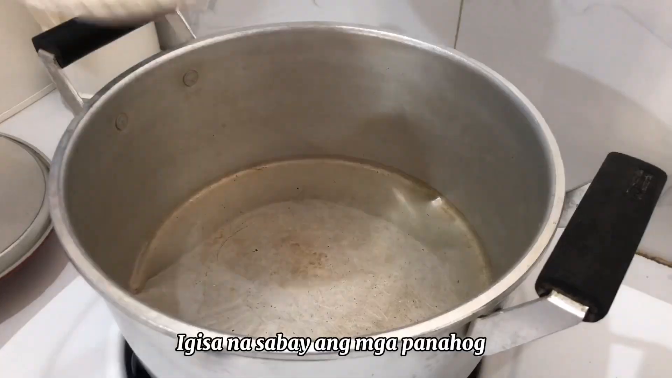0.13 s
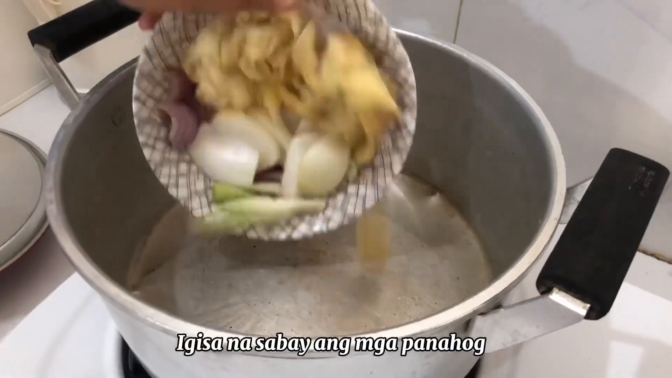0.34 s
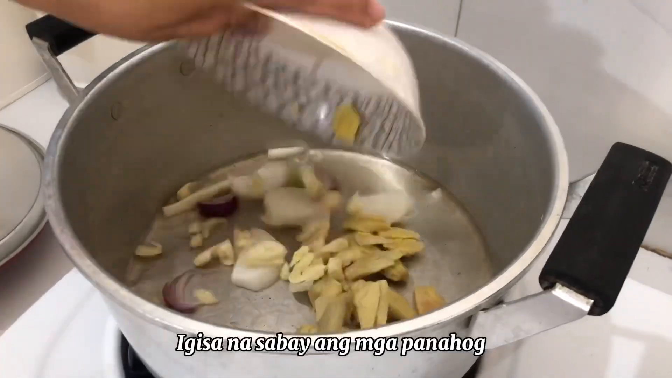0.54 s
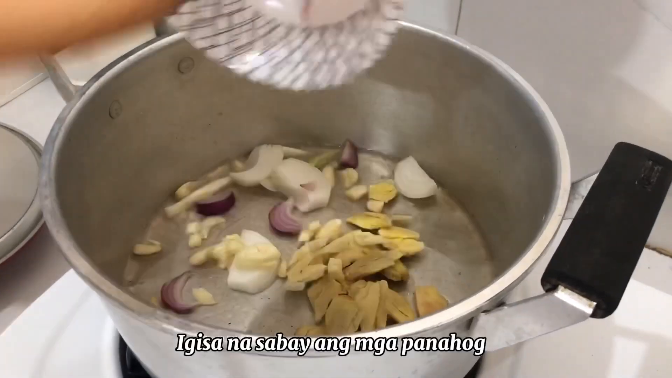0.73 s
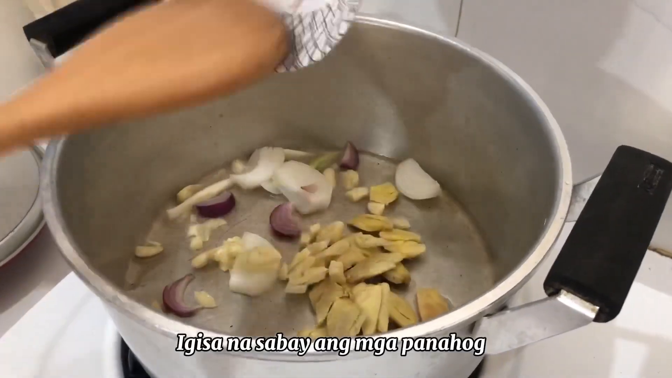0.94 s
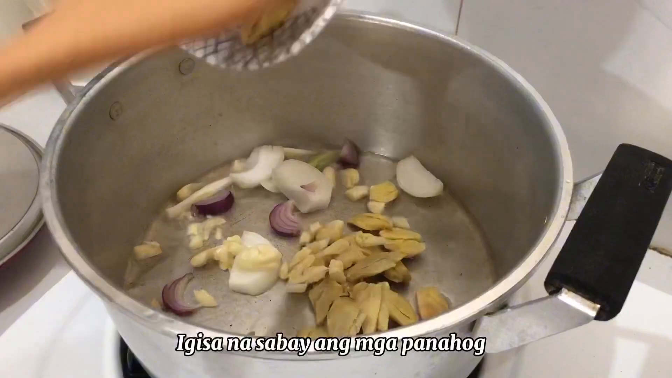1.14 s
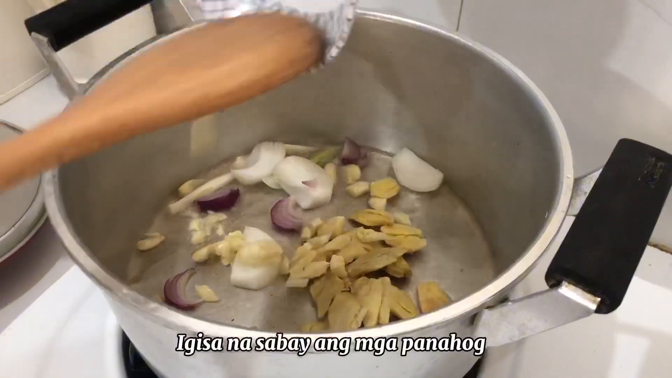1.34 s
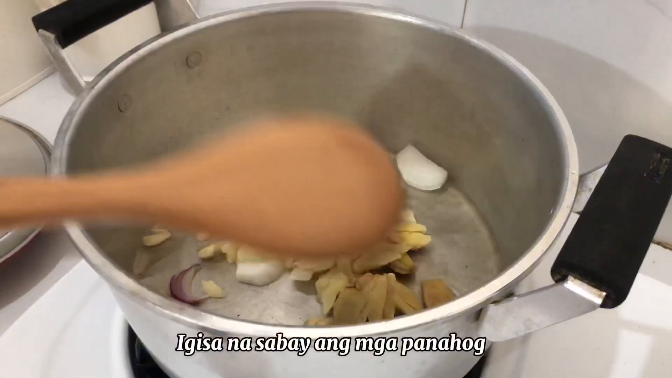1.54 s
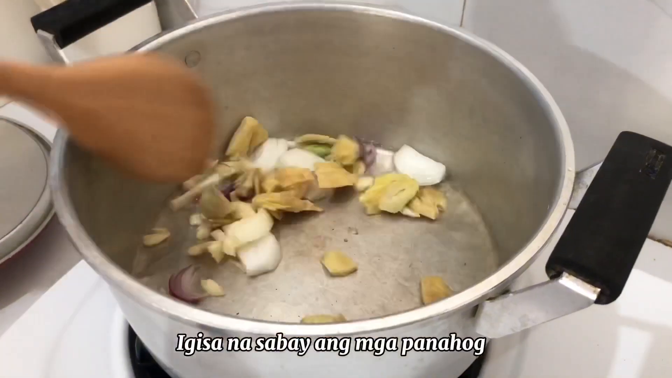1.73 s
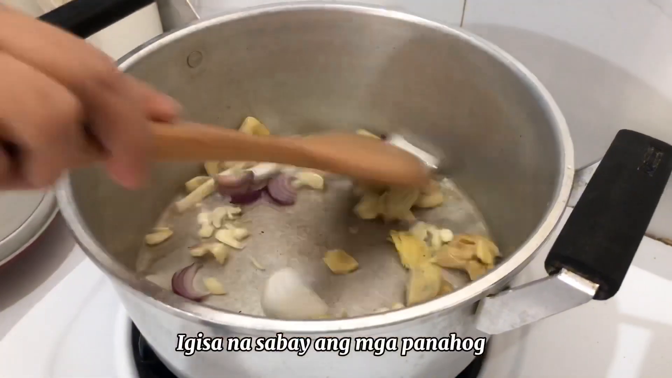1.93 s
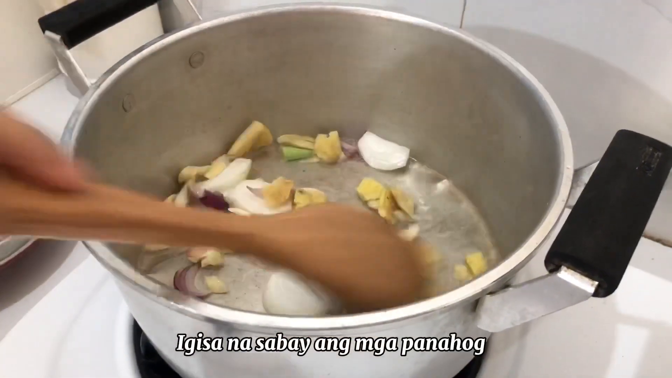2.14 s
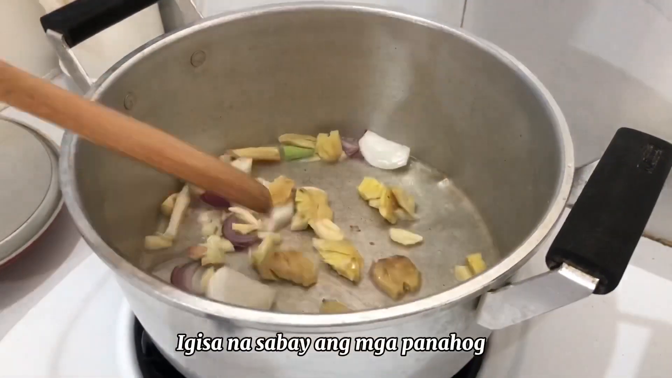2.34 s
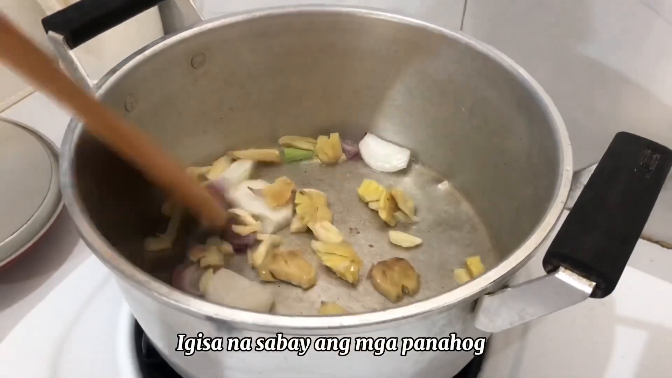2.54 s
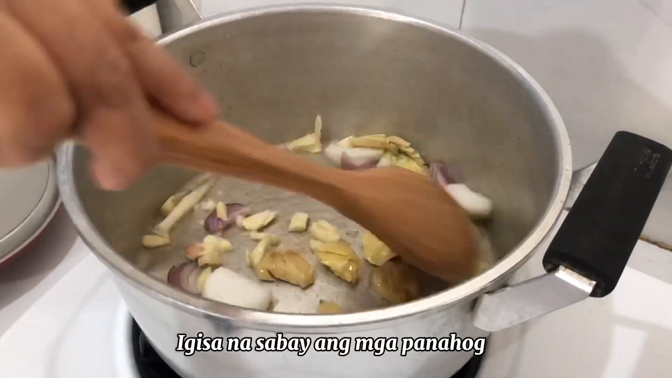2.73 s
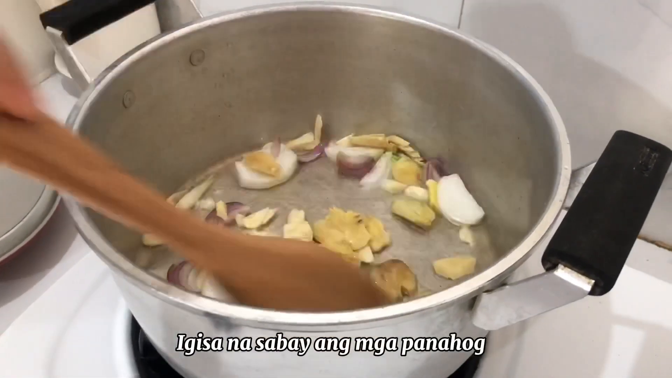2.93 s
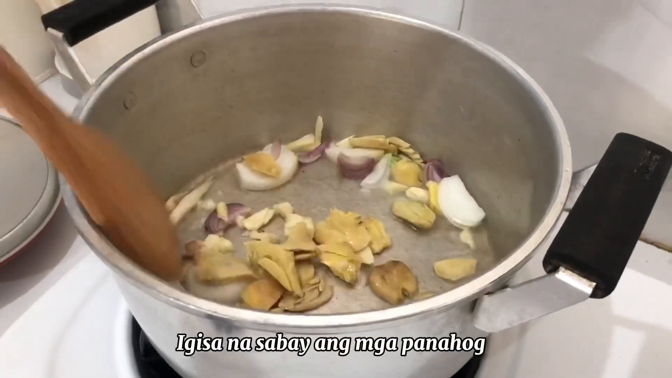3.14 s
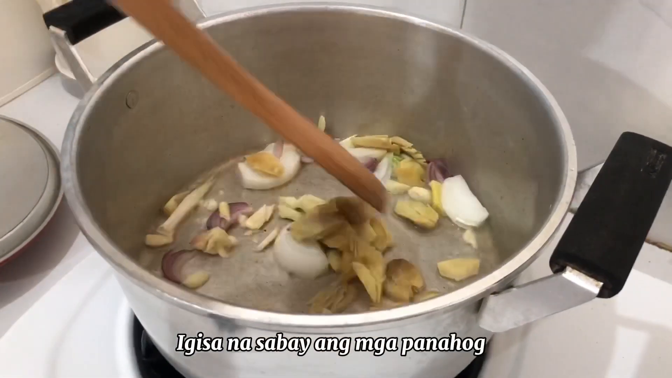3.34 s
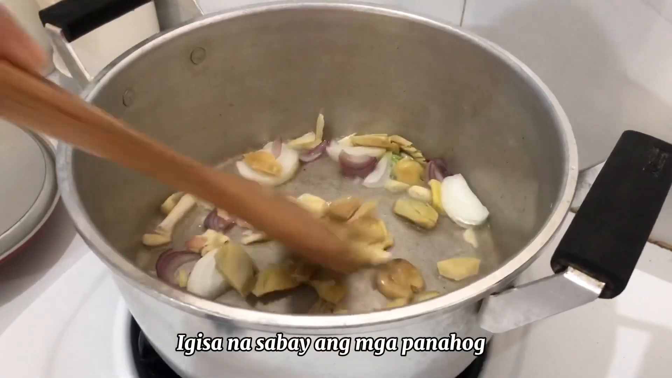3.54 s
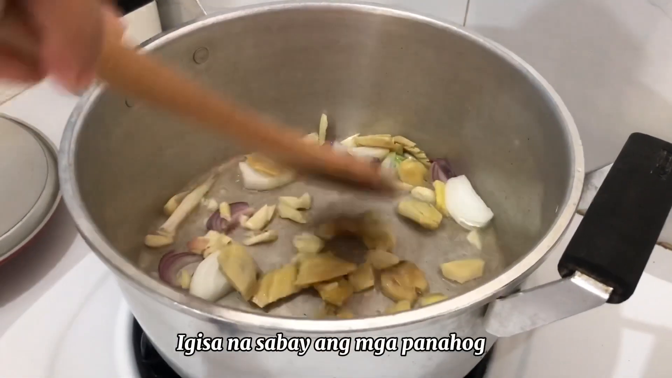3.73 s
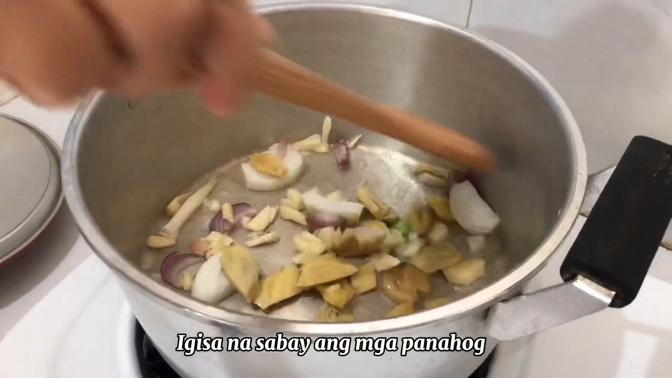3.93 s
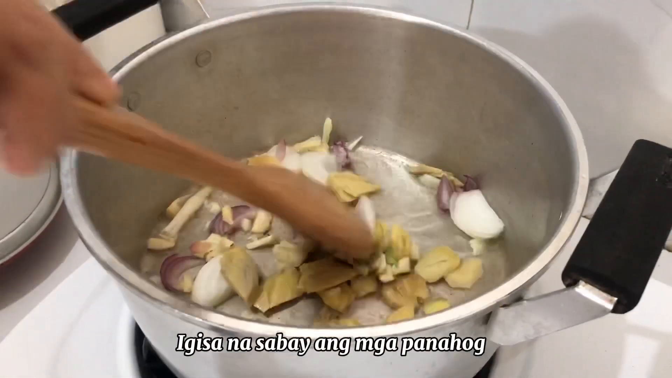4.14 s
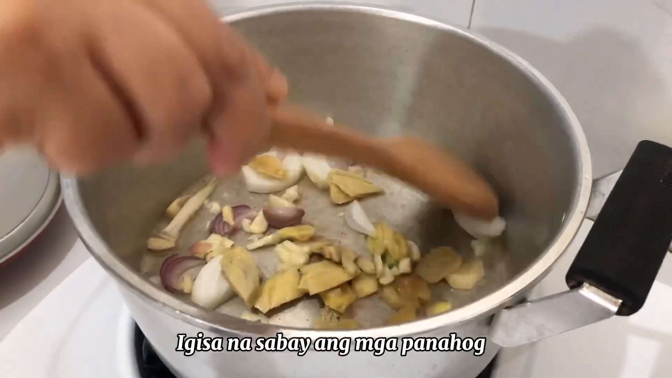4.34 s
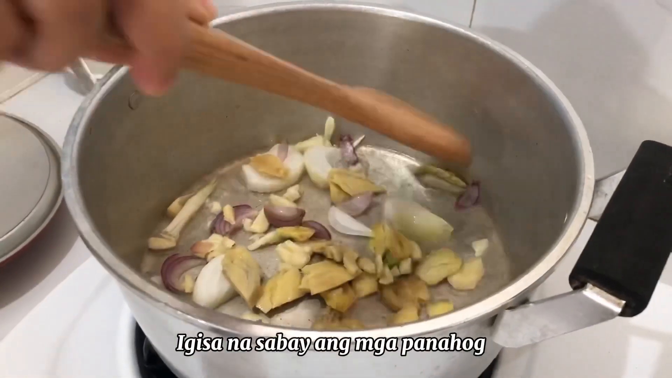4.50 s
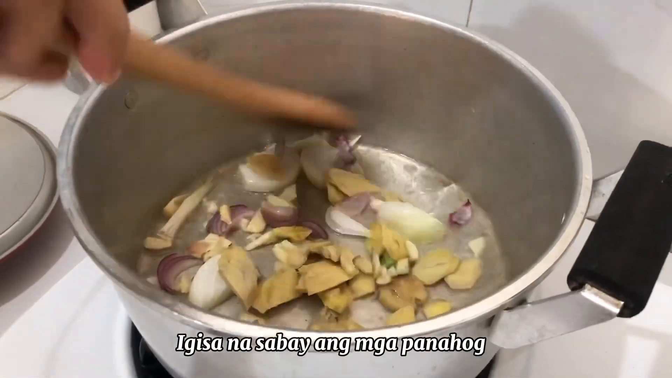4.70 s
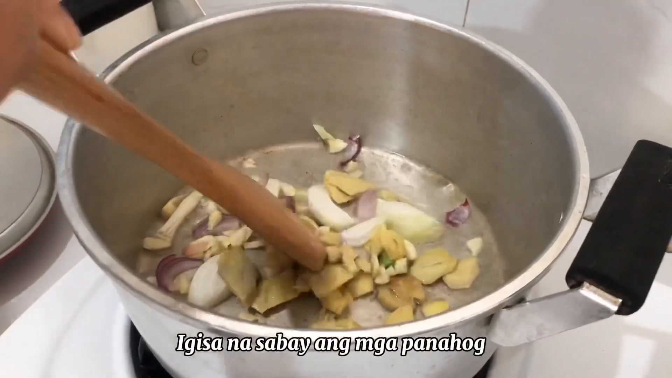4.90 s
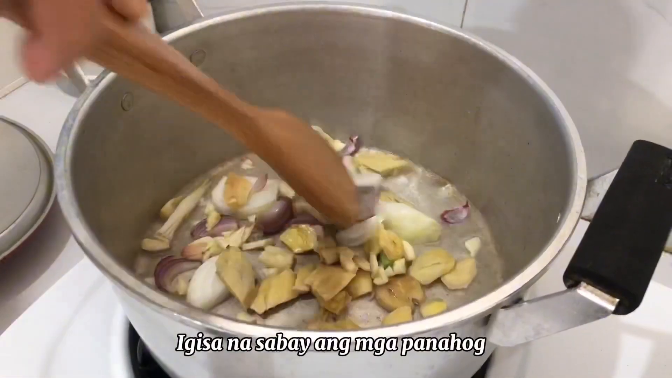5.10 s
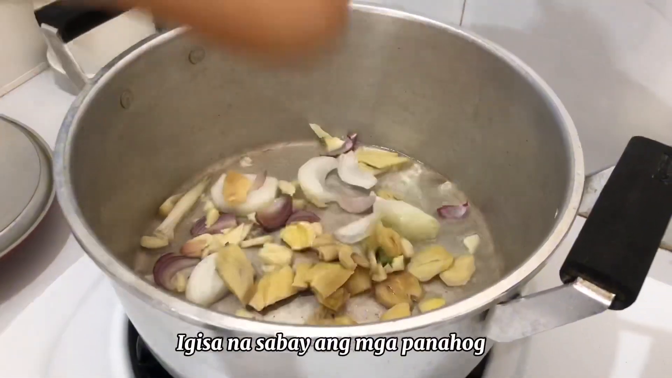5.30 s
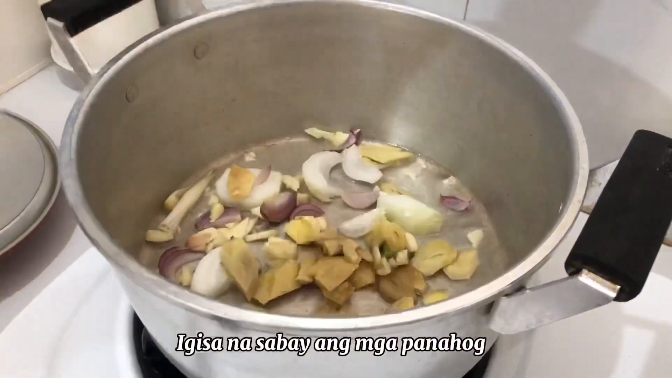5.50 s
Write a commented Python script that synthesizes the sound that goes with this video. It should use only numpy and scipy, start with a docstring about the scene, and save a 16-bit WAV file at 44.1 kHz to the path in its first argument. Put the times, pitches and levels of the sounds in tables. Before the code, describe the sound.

A faint, low motor hum and thin room air start, drop out for an instant at about 0.04 s and fade straight back. Around 0.4 s onion and ginger tumble into a deep metal pot with small clattering, briefly ringing bumps, and hot oil begins to hiss. From 0.85 to 1.5 s a wooden spoon taps and rubs a small bowl with dull, hollow knocks, while sharp pops and tiny rising steam whistles cluster until about 1.8 s. More wet food makes the sizzle flare at 1.46 s and again near 2.07 s; it is fullest around 2.3-3.1 s. The spoon knocks and scrapes the pot, with a hard, loud knock at 2.94 s, short drags to 3.6 s and another strong knock at 3.75 s. Softer frying flares near 4 and 4.9 s, with lighter knocks, scattered pops and dull plops at 4.5 and 5.4 s, easing at the end. Close microphone above the rim.

```python
"""A faint motor hum and room air cut out for a moment and fade back in; then wet onion and ginger
fall from a small bowl into hot oil in a deep metal pot and sizzle, pop and whistle.
A wooden spoon taps the bowl, then knocks and scrapes the pot. Frying is filtered noise and short wave
packets, pops and whistles are noise bursts through resonances, and blows are gritty forces exciting
decaying modes. One microphone above the rim receives all sources."""
import sys
import numpy as np
from scipy import signal
from scipy.io import wavfile
from scipy.ndimage import uniform_filter1d

SR = 44100
rng = np.random.default_rng(int(sys.argv[2]) if len(sys.argv) > 2 else 0)


def store_wav(level_fs):
    """Save 16-bit WAV to argv[1]."""
    pcm = np.round(np.clip(np.atleast_2d(level_fs), -1, 1) * 32767)
    wavfile.write(sys.argv[1], SR, pcm.T.astype(np.int16))


N = 245195
T = np.arange(N) / SR  # time in seconds

# Slow level of the frying. Each row: time in seconds, level in dB.
FRYING_LEVEL = [(.476, -52), (.507, -30), (.81, -29.5), (.93, -32), (1.1, -33), (1.32, -35.5),
                (1.42, -33.5), (1.58, -33.5), (1.82, -30), (1.98, -29), (2.3, -26), (2.57, -26),
                (2.69, -28), (3.07, -26.5), (3.48, -31), (3.7, -32), (3.8, -31.5), (3.93, -33.5),
                (4.12, -30.5), (4.6, -31), (4.81, -32), (5.3, -32.5), (5.56, -36.5)]
# A wet face meets the hot oil and the frying flares up. Each row: start in seconds, level in dB.
FLARE_UPS = [(0.395, -43), (0.44, -37.5), (.895, -40), (1.462, -24.5), (1.64, -29), (1.70, -28),
             (2.07, -25.5), (2.615, -33), (3.955, -27), (4.07, -27), (4.87, -27)]
FLARE_RISE_S, FLARE_T60_S = 0.014, 0.29
# Spectrum of the frying. Each row: frequency in Hz, relative density in dB per Hz.
FRYING_SPECTRUM = [(150, -28.5), (250, 1.5), (268, -19.5), (618, -16.5), (761, -17), (1120, -12.5),
                   (1310, -19), (1640, -14.5), (2490, -14.5), (7060, -2.5), (12800, -6), (16000, -16)]
# Changing brightness of the frying. Each row: time in seconds, treble over the middle in dB,
# low fizz over the middle in dB.
FRYING_TILT = [(.45, -0.5, 6.5), (.6, 1.5, -2), (.8, -2.5, -2.5), (1.2, -3, 1.5), (1.7, -6, 0.5),
               (2.1, -2, -2.5), (2.4, -5, -2), (3.6, -3, -1), (5.5, -4.5, -2)]
# Steam pockets bursting. Each row: time in seconds, peak at the source in dB, centre in Hz,
# spray relative to the click in dB.
STEAM_POPS = [(0.1617, -46, 3370, -12), (0.663, -9, 7600, -16), (.9033, -13.5, 9500, -3),
              (0.9347, -9, 12700, -22), (.985, -18.5, 2800, -11), (1.043, -16.5, 4700, -12.5),
              (1.0508, -12.5, 11500, -20), (1.1126, -12.5, 8200, -10), (1.1906, -11.5, 10100, -28),
              (1.2376, -16, 10000, -10), (1.2473, -17, 9000, -27), (1.263, -19, 8000, -4),
              (1.325, -18, 8500, -9), (1.3632, -10, 8100, -21), (1.422, -8, 7200, -18),
              (1.449, -6.5, 7300, -14), (1.457, -13, 6300, -23), (1.58, -10, 5650, -12),
              (1.624, -18, 5500, -6), (1.6314, -14, 4900, -15), (1.7039, -9.5, 5900, -15),
              (2.086, -9, 10800, -31), (2.2862, -8.5, 9700, -9), (2.4078, -12, 9000, -25),
              (2.4442, -6, 9100, -24), (2.446, -17, 3000, -20), (2.6167, -10, 6000, -14),
              (2.7566, -8.5, 9700, -17), (2.896, -13, 7200, -10), (2.985, -14, 5200, -25),
              (2.993, -18, 4000, -25), (3.09, -12, 6850, -10), (3.2305, -9.5, 6260, -13),
              (3.3252, -12, 7500, -11), (3.3812, -13.5, 11700, -9), (3.575, -15, 6900, -15),
              (3.751, -15.5, 6450, -21), (3.8345, -16, 5900, -18), (3.9595, -20, 6500, -18),
              (4.0358, -16, 9100, -20), (4.0458, -9.5, 6860, -13), (4.1744, -13.5, 8800, -19),
              (4.4153, -14, 10900, -17), (4.418, -13.5, 7800, -15), (4.53, -14, 3500, -22),
              (4.881, -13, 6800, -26), (4.8867, -9, 3970, -20), (4.948, -13.5, 6660, -6),
              (5.0806, -19, 8500, -7), (5.2056, -16.5, 6960, 0), (5.305, -16, 6440, -2),
              (5.4084, -18, 8400, -31), (5.4727, -18, 2300, -17.5), (5.5392, -15, 6850, -10)]
PLOP_DB = -20  # dull plop relative to its burst
# Steam whistling out from under a piece. Each row: start in seconds, peak at the source in dB,
# middle pitch in Hz.
STEAM_WHISTLES = [(1.127, -31, 3030), (1.156, -30, 3160), (1.178, -26.5, 5630), (1.199, -23.5, 3930),
                  (1.256, -27.5, 4090), (1.3268, -26, 3070), (1.355, -29, 3240), (1.382, -24, 4200),
                  (1.4725, -26, 5320), (1.5, -22, 4120), (1.51, -25, 5480), (1.599, -29, 4100),
                  (1.618, -21, 5430), (1.646, -25, 5570), (1.663, -21, 4310), (1.679, -29, 4340),
                  (1.72, -29, 4380), (1.786, -28, 5500), (2.465, -26, 4150), (3.0074, -24, 3660),
                  (3.8521, -28, 5700), (4.3094, -29, 3830)]
WHISTLE_S = 0.029
WHISTLE_GLIDE = 0.061  # total rise as a share of the pitch, as the gap narrows
ECHO_S, ECHO_DB = 0.00175, -14.5  # round trip between food and mouth of the pot; treble loss comes on top
ECHO_DULL = 0.55  # treble escaping on each bounce, 0-1

# Spoon knocking and rubbing on the bowl. Each row: start in seconds, peak in dB, contact in seconds,
# free ringing relative to the damped knock in dB.
BOWL_TAPS = [(.855, -21.5, .04, -9), (1.058, -21, 0.057, -12), (1.25, -20, 0.031, 1), (1.297, -24, 0.02, 1),
             (1.42, -23.5, 0.041, 4), (1.459, -25.5, 0.024, 12)]
TAP_HZ, TAP_THUD_DB = 890, -46
# Modes of the bowl. Each row: frequency in Hz, level in dB, 60 dB decay time in seconds.
BOWL_MODES = [(370, -12.5, 0.12), (530, -10, 0.13), (952, 0, 0.092), (1144, -9.5, 0.041), (1330, -13, 0.03),
              (1800, -17, 0.035)]
# Food and spoon striking the pot, and two dull, low plops of bursting steam (at 4.526 and 5.415 s).
# Each row: start in seconds, peak in dB, centre in Hz, free ringing relative to the damped knock in dB,
# thud relative to the peak in dB.
POT_KNOCKS_AND_PLOPS = [(1.637, -34.5, 1100, -12, 2), (1.748, -29.5, 980, 22, -14),
                        (1.799, -28, 694, -9, -18), (1.866, -32.5, 1170, 11, -8),
                        (1.982, -33.5, 1090, 7, -5), (2.393, -28.5, 1210, -6, -28),
                        (2.444, -23, 1030, 8, -10), (2.908, -20, 790, -8, -15), (2.941, -8, 1220, -11, -22),
                        (2.954, -20, 684, -6, -10), (3.745, -11.5, 694, -4, -23), (3.895, -34, 530, 0, 2.5),
                        (4.039, -24.5, 635, 7, -10.5), (4.165, -22.5, 600, 0, -6),
                        (4.325, -36, 1160, -1, -24), (4.419, -23.5, 980, -6, -27),
                        (4.526, -30.5, 1120, -7, -17), (4.94, -23, 510, 0, -2),
                        (5.415, -27, 1180, -14, -16)]
KNOCK_CONTACT_S = 0.00914
# Food tumbling and the spoon dragging over the pot. Each row: start in seconds, peak in dB,
# centre in Hz, contact in seconds, free ringing relative to the damped part in dB,
# thud relative to the peak in dB.
POT_SCRAPES = [(.385, -36, 1600, 0.035, -5, -30), (.396, -21.5, 910, 0.018, 17, -40),
               (.415, -33.5, 800, 0.017, 5, -35), (.437, -18.5, 774, 0.027, 12, -38),
               (.47, -26.5, 660, 0.16, -2, -18), (.685, -31.5, 653, 0.038, 13, -22),
               (1.635, -29.5, 1190, 0.06, 16, 1), (1.805, -25, 870, 0.022, 18, -7),
               (2.45, -26.5, 1060, 0.11, 3, -25), (2.885, -28.5, 710, 0.066, 15, -8),
               (2.96, -33, 780, 0.066, -7, -11), (3.14, -24, 1120, 0.047, -5, -32),
               (3.195, -25, 1440, 0.071, -21, -13), (3.235, -26, 700, 0.067, -28, -17),
               (3.568, -27.5, 625, 0.076, -4, -11), (4.425, -33, 880, .028, -8.5, -3),
               (4.6, -46, 486, 0.082, -4, 13), (4.765, -27, 1230, 0.062, -17, -19)]
# Modes of the pot. Each row: frequency in Hz, level in dB, 60 dB decay time in seconds.
POT_MODES = [(368, -3.5, 0.063), (530, 0.5, 0.14), (634, 4.5, 0.098), (726, 0, 0.041), (946, -2.5, 0.1),
             (1062, 3, 0.091), (1154, 1.5, 0.024), (1304, -10, 0.15), (1534, -5.5, 0.38),
             (1722, -0.5, 0.13), (1884, -5.5, 0.066), (1792, -1.5, 0.061), (2050, -1.5, 0.074),
             (2220, 2.5, 0.095), (2600, -1, 0.095), (2870, -6, 0.07), (3300, -3, 0.05)]
# The whole pot on the stove. One row: frequency in Hz, 60 dB decay time in seconds.
THUD_HZ, THUD_T60_S = (216, 0.036)

HUM_HZ, HUM_DB = 239.4, -54
# Fuzzy motor tone. One row: centre in Hz, width of each of two resonances in Hz, level in dB.
FUZZ_HZ, FUZZ_WIDTH_HZ, FUZZ_DB = (132.5, 17, -54.5)
# Spectrum of the room air. Each row: frequency in Hz, relative density in dB per Hz.
ROOM_SPECTRUM = [(12, -69), (20, -17), (123, 16.5), (187, -99), (241, -12), (293, -6), (399, -14.5),
                 (1290, -16.5), (2820, -26.5), (5230, -30), (12100, -42.5), (16000, -59)]
ROOM_DB = -50
# The short gap. One row: cut in seconds, start of the return in seconds, full level in seconds.
GAP_CUT_S, GAP_RETURN_S, GAP_FULL_S = (0.034, 0.045, 0.085)
BASS_CUT_HZ, TREBLE_CUT_HZ = 165, 15900


def sizzle():
    """Superposition: dense bubble hiss and larger crackles, fluctuating at random in frequency and time."""
    drive = rng.standard_normal(N) + amp(-10) * crackle()
    s, treble_db, low_db = np.transpose(FRYING_TILT)

    def field_db(hz, t):
        """Spectral tilt, with smoothed random gains in frequency and time and a broadband flicker."""
        fluctuation = rng.standard_normal((len(hz), len(t)))
        fluctuation = uniform_filter1d(fluctuation, size=12, axis=0)
        fluctuation = evened(uniform_filter1d(fluctuation, size=14, axis=1))
        flicker = evened(uniform_filter1d(rng.standard_normal(len(t)), size=4))
        high = np.clip(np.log2(hz / 5500 + 1e-9), 0, 1)
        low = np.clip(np.log2(4000 / (hz + 1)), 0, 1)
        tilt = high * np.interp(t, s, treble_db) + low * np.interp(t, s, low_db)
        return tilt + 1.32 * fluctuation + 0.97 * flicker

    return frying_level() * evened(coloured(drive, FRYING_SPECTRUM, field_db))


def frying_level():
    """Incoherent sources add in power: the slow level of the pan plus quick flare-ups, as a gain."""
    power = amp(np.interp(T, *np.transpose(FRYING_LEVEL), left=-120)) ** 2
    for s, db in FLARE_UPS:
        age = np.maximum(T - s, 0)
        rise = np.minimum(age / FLARE_RISE_S, 1)
        power = power + (amp(db - 60 * age / FLARE_T60_S) * rise) ** 2
    return np.sqrt(power)


def crackle():
    """Each bubble is a damped oscillator of a few cycles; pitch and strength are random."""
    strength = amp(2.7 * np.minimum(rng.exponential(1, N), 3.3))
    bubbles = strength * (rng.random(N) < 1200 / SR)  # about 1200 a second
    pitch, t, out = rng.integers(0, 24, N), T[:300], np.zeros(N)
    for k, hz in enumerate(np.geomspace(1500, 15000, num=24)):
        envelope = (1 - np.exp(-t * hz)) * np.exp(-t * hz / 3.2)
        grain = np.sin(2 * np.pi * hz * t) * envelope
        out += signal.oaconvolve(bubbles * (pitch == k), grain / np.linalg.norm(grain))[:N]
    return evened(np.diff(out, prepend=0))


def pops():
    """Sudden pressure release: a click of a few cycles and milliseconds of spray, over a duller plop."""
    out, t = np.zeros(N), T[:1500]
    band = signal.butter(2, [2300, 13000], "band", fs=SR, output="sos")
    sprays = rng.standard_normal((len(STEAM_POPS), len(t)))
    for (s, db, hz, spray_db), spray in zip(STEAM_POPS, sprays):
        click = np.sign(spray) * np.exp(-t / 0.00018)  # the skin tears in a fraction of a millisecond
        burst = click + (t == 0) + amp(spray_db - 60 * t / 0.044) * spray
        bright = resonate(burst, hz, 2300) + 0.19 * burst
        plop = resonate(resonate(burst, 1620, 1150), 1620, 1150)
        add(out, s - 0.0002, db, signal.sosfilt(band, bright))
        add(out, s - 0.0002, db + PLOP_DB, plop)
    return out


def squeaks():
    """A turbulent jet excites a resonance: short sputtering whistles of steam with rising pitch."""
    out, t = np.zeros(N), T[:3000]
    jets = rng.standard_normal((len(STEAM_WHISTLES), len(t)))
    for (s, db, hz), air in zip(STEAM_WHISTLES, jets):
        u = np.minimum(t / WHISTLE_S, 1)
        sputter = air ** 3 * np.sin(np.pi * u ** 0.47)  # cubed noise: uneven spurts
        pitch = hz * (1 + WHISTLE_GLIDE * (u - 0.5))
        add(out, s, db, resonate(resonate(sputter, pitch, 420), pitch, 720))
    return out


def depth(x):
    """Repeated reflection between bottom and mouth of the pot: spaced peaks, clearest in the low fizz."""
    loop = np.zeros(round(ECHO_S * SR) + 1)
    loop[0], loop[1] = 1, -ECHO_DULL
    loop[-1] = -amp(ECHO_DB) * (1 - ECHO_DULL)
    return signal.lfilter([1, -ECHO_DULL], loop, x)


def pot_knocks_and_plops():
    """Impulsive excitation: blows of food and spoon, and two dull steam plops, all through the pot's modes."""
    hits = [(s, db, hz, KNOCK_CONTACT_S, ring_db, thud_db)
            for s, db, hz, ring_db, thud_db in POT_KNOCKS_AND_PLOPS]
    return blows(hits, POT_MODES, rise=0.4814, rasp_db=-4.5, strike=0.7)


def pot_scrapes():
    """Frictional excitation: tumbling food and the dragging spoon drive the modes of the pot."""
    return blows(POT_SCRAPES, POT_MODES, rise=0.56, rasp_db=-9.5, strike=0.05)


def bowl_taps():
    """Contact excitation: the spoon knocks and rubs the modes of the small bowl."""
    taps = [(s, db, TAP_HZ, contact, ring_db, TAP_THUD_DB) for s, db, contact, ring_db in BOWL_TAPS]
    return blows(taps, BOWL_MODES, rise=0.8, rasp_db=-2, strike=0.14)


def blows(table, modes, rise, rasp_db, strike):
    """Modal response: a gritty force drives damped and free modes, and a thump of the stove."""
    out, t = np.zeros(N), T[:6000]
    free, thud = ring(modes), ring([(THUD_HZ, 0, THUD_T60_S)])
    damped = free[:len(t)] * amp(-60 * t / 0.016)  # while wood or food still rests on the wall
    grits = rng.standard_normal((len(table), len(t)))
    for (s, db, hz, contact, ring_db, thud_db), grit in zip(table, grits):
        u = np.minimum(t / contact, 1)
        pressure = np.sin(np.pi * u ** rise) ** 2  # small rise = early peak
        push = grit * abs(grit) * pressure  # squared noise, sign kept: uneven slips
        push[pressure.argmax()] += strike * np.linalg.norm(push)  # one clean blow inside the grit
        colour = evened(resonate(resonate(push, hz, 1.08 * hz), hz, 1.08 * hz))
        colour += amp(rasp_db) * evened(resonate(push, 2000, 1460))
        knock = evened(signal.fftconvolve(colour, damped)[:len(t)])
        ringing = evened(signal.fftconvolve(colour, free)[:len(t)])
        add(out, s, db, knock + amp(ring_db) * ringing)
        add(out, s, db + thud_db, signal.fftconvolve(push, thud))
    return out


def ring(modes):
    """Impulse response of a vibrating body: a sum of exponentially decaying modes."""
    t = T[:SR // 5]
    return sum(amp(db - 60 * t / t60) * np.sin(2 * np.pi * hz * t) for hz, db, t60 in modes)


def kitchen():
    """Steady background: a slightly wavering motor tone, a fuzzy tone below it and the air of the room."""
    return motor_hum() + motor_fuzz() + room_air()


def motor_hum():
    """Periodic source: a sine whose level and phase waver slowly."""
    waver = uniform_filter1d(rng.standard_normal(N), size=3000)
    waver = evened(uniform_filter1d(waver, size=3000))
    tone = amp(HUM_DB + 1.6 * waver) * np.sin(2 * np.pi * HUM_HZ * T + 0.73 * waver)
    return np.sqrt(2) * tone  # a sine's rms is its peak over root two


def motor_fuzz():
    """Narrow-band noise: two equal resonances in series turn noise into a fuzzy tone."""
    once = resonate(rng.standard_normal(N), FUZZ_HZ, FUZZ_WIDTH_HZ)
    return amp(FUZZ_DB) * evened(resonate(once, FUZZ_HZ, FUZZ_WIDTH_HZ))


def room_air():
    """Stationary random noise shaped to the spectrum of the room."""
    return amp(ROOM_DB) * evened(coloured(rng.standard_normal(N), ROOM_SPECTRUM))


def amp(db):
    """Logarithmic level: decibels to gain."""
    return 10 ** (np.asarray(db) / 20)


def evened(x):
    """Effective value: scales to rms 1."""
    return x / np.sqrt(np.mean(x ** 2) + 1e-20)


def add(mix, s, db, sound):
    """Linear superposition: mixes a sound in at time s, scaled to a peak of db."""
    part = mix[round(s * SR):][:len(sound)]
    part += amp(db) * sound[:len(part)] / abs(sound).max()


def coloured(x, points, field_db=0):
    """Short-time filtering: gives x a spectrum, and a gain field over frequency and time."""
    hz, t, z = signal.stft(x, SR, nperseg=512, noverlap=384)
    f, db = np.transpose(points)
    field = field_db(hz[:, None], t) if callable(field_db) else field_db
    spectrum_db = np.interp(np.log(hz + 1), np.log(f), db)[:, None]
    return signal.istft(z * amp(spectrum_db + field), SR, nperseg=512, noverlap=384)[1][:N]


def resonate(x, hz, width_hz):
    """Resonance by frequency shift: low-pass around a fixed pitch or a pitch curve, with gain 1."""
    turn = np.exp(2j * np.pi * np.cumsum(hz * np.ones(len(x))) / SR)
    r = np.exp(-np.pi * width_hz / SR)
    return 2 * (turn * signal.lfilter([1 - r], [1, -r], x / turn)).real


def scene():
    """Linear superposition of all sources at one microphone; only the sizzle, pops and squeaks echo."""
    food = depth(sizzle() + pops() + squeaks())
    mono = food + pot_knocks_and_plops() + pot_scrapes() + bowl_taps() + kitchen()
    return np.array([mono, mono])


def record(dry):
    """Band limiting: the microphone loses deep bass; a short gap fades back in; then the top is cut."""
    high_pass = signal.butter(2, BASS_CUT_HZ, "high", fs=SR, output="sos")
    thin = signal.sosfilt(high_pass, dry)
    fade_in = np.clip((T - GAP_RETURN_S) / (GAP_FULL_S - GAP_RETURN_S), 0, 1) ** 2
    gain = np.where(T < GAP_CUT_S, 1, fade_in)
    low_pass = signal.firwin(511, TREBLE_CUT_HZ, window=("kaiser", 9), fs=SR)
    return signal.oaconvolve(thin * gain, low_pass[None], "same")


dry = scene()
out = record(dry)
store_wav(out)
```